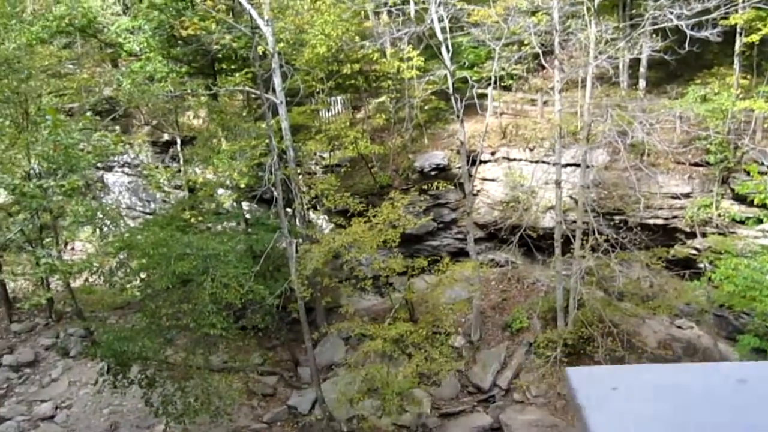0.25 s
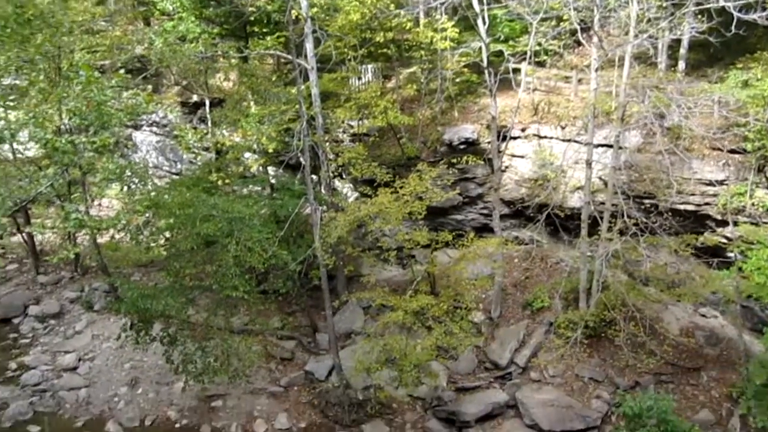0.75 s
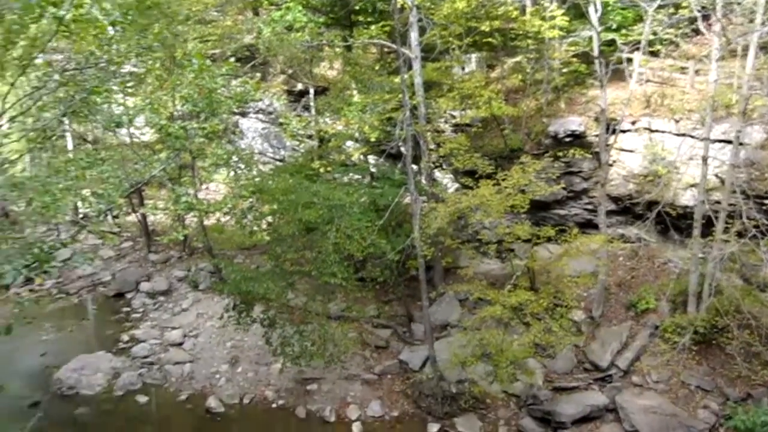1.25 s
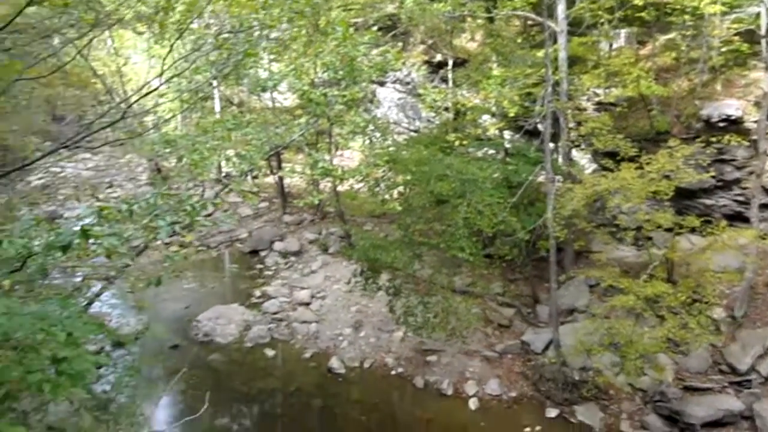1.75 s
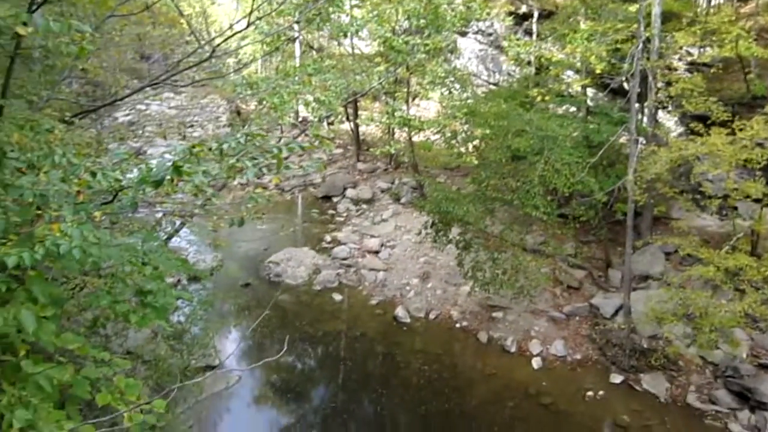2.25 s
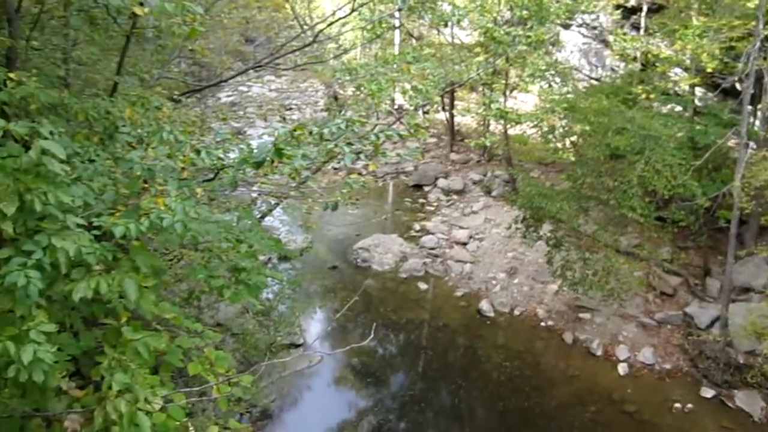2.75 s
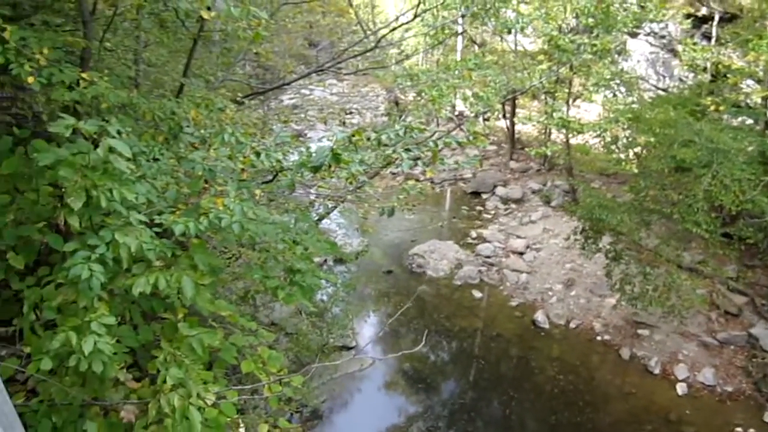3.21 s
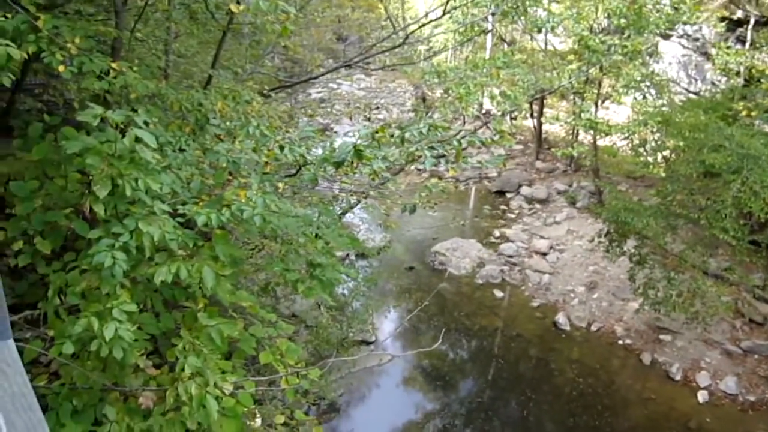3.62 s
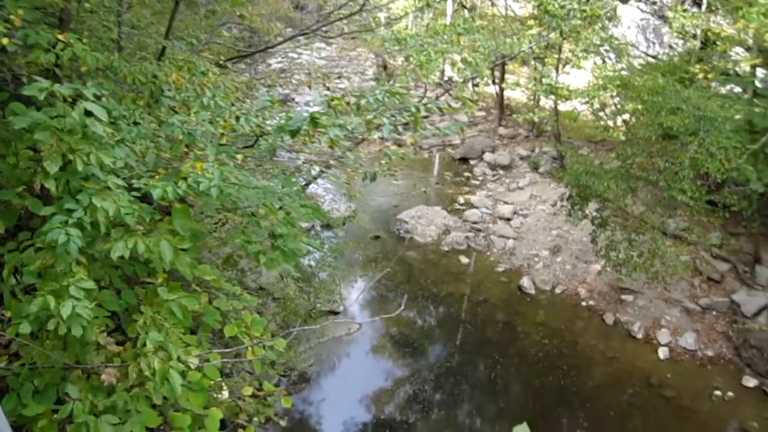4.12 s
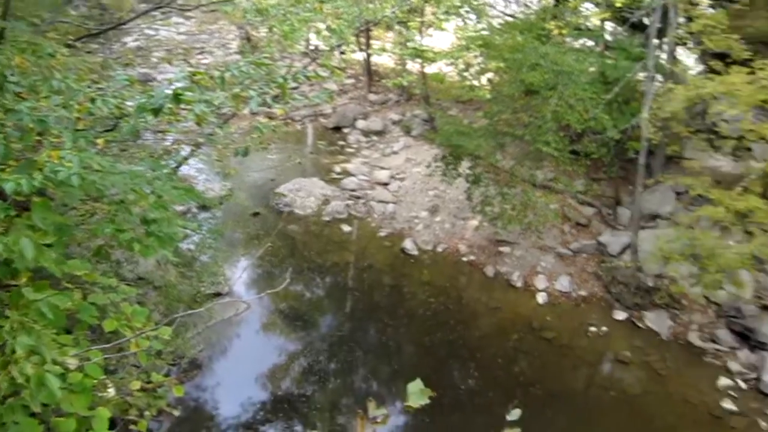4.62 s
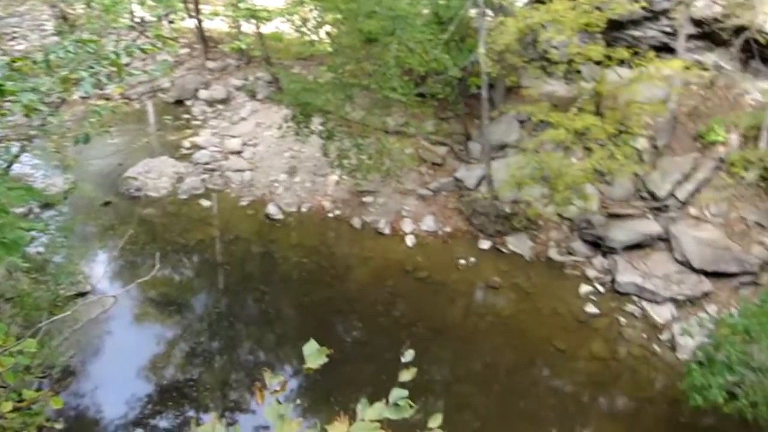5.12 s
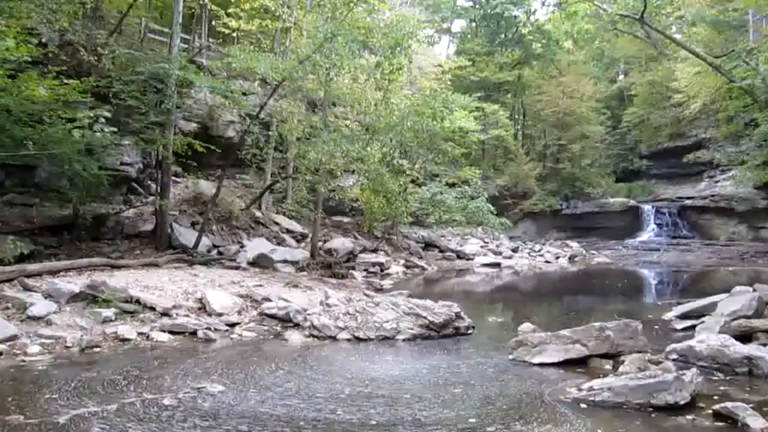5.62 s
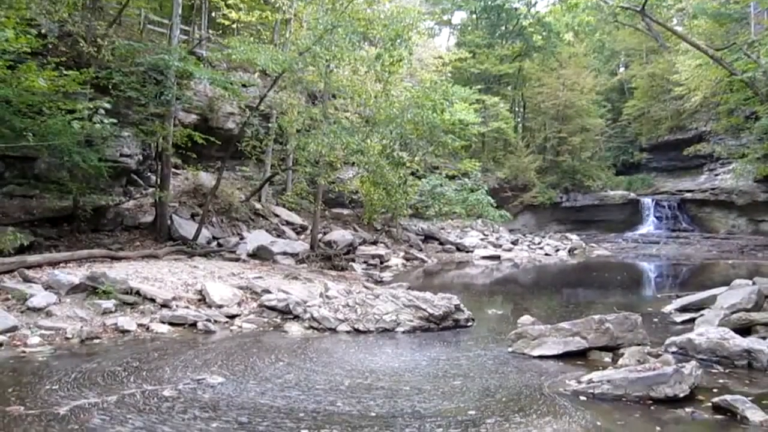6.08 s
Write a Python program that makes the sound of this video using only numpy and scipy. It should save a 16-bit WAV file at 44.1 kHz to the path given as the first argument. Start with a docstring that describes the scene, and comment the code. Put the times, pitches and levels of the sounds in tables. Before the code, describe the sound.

From 0 s a waterfall in a wooded creek valley rushes steadily, a dense, fairly bright noise with faint low-middle gurgling, picked up by a hand-held camera microphone, the same in both channels. A tiny tap comes at the very start, and a barely audible low drone lies beneath. Around 3.45-3.7 s a finger rubs the case: a short, uneven, bright scratch with a catch near 3.6 s and tiny sharp clicks at 3.6, 3.7 and 3.8 s. From about 4.1 s the hand closes round the microphone; the rush grows a little louder, hollow and nasal with airy hiss, with small clicks at 4.3 and 5.3 s and softer, fainter bumps between. The hollow tone swells slightly until everything cuts off at 5.5 s. After complete silence, at 5.75 s the waterfall returns abruptly, quieter, steadier and duller, from farther away. One crisp knock sounds at 5.94 s; the rush continues to the end, about 6.4 s.

```python
"""A wooded creek valley, where a waterfall rushes before a hand-held camera with one microphone.
The rush is noise shaped over frequency and time; the cupping hand adds moving resonances to it.
A finger rub is unevenly modulated noise, and knocks are short tone bursts that fall in pitch.
After a short silence the fall is heard, duller, from a second, farther spot.
A faint low drone, a sum of sines, lies under both."""
import sys
import numpy as np
from scipy import signal
from scipy.io import wavfile
from scipy.ndimage import uniform_filter1d

SR = 44100
rng = np.random.default_rng(int(sys.argv[2]) if len(sys.argv) > 2 else 0)


def waveform_to_disk(signal):
    """Save audio, clipped to [-1, 1], as 16-bit WAV at the path in sys.argv[1]."""
    frames = np.transpose(np.atleast_2d(signal))
    scaled = np.clip(frames, -1, 1) * 32767
    samples = np.round(scaled).astype(np.int16)
    wavfile.write(sys.argv[1], SR, samples)


N = 280035
SILENCE_START_S, SILENCE_END_S = 5.5098, 5.7422  # between the two spots


def amp(db):
    """Decibel law: amplitude ratio of a level."""
    return 10 ** (np.asarray(db) / 20)


def evened(x):
    """Normalisation to unit root-mean-square."""
    return x / np.sqrt(np.mean(x ** 2) + 1e-20)


def bump(x, centre, width):
    """Gaussian resonance: a bell-shaped lift of height 1."""
    return np.exp(-(2 * (x - centre) / width) ** 2)


def read(points, hz):
    """Logarithmic interpolation: value of a spectrum on a log-frequency axis."""
    f, value = np.transpose(points)
    return np.interp(np.log(hz + 1), np.log(f + 1), value)


def follow(rows, t):
    """Linear interpolation: every column of a table at the times t."""
    s, *columns = np.transpose(rows)
    return [np.interp(t, s, column) for column in columns]


def noise(field, size):
    """Short-time spectral synthesis: Gaussian noise shaped in dB by field(hz, t), each frame of equal power."""
    hop = size // 4
    hz = np.fft.rfftfreq(size, 1 / SR)[:, None]
    t = np.arange(N // hop + 5) * hop / SR
    gain = amp(field(hz, t) + 0 * t)
    gain = gain / np.sqrt((gain ** 2).mean(0))
    real, imaginary = rng.standard_normal((len(t), size // 2 + 1, 2)).T
    spectra = (real + 1j * imaginary) * gain
    sound = signal.istft(spectra, nperseg=size, noverlap=size - hop)[1]
    return evened(sound[:N])


# low drone: (time [s], fundamental level [dB], shift of all overtones [dB])
DRONE_COURSE = [(0, -66, -9), (1, -59, -10), (2.2, -56.5, -7), (2.6, -63, 3.5), (3.9, -64.5, 5),
                (4.15, -64, -12), (4.5, -61, -12), (5.1, -56.5, -9), (5.5, -59.5, -17.5), (5.95, -58, -26),
                (6.35, -60, -25)]
# overtones before that shift: (multiple of the fundamental, level relative to it [dB])
DRONE_OVERTONES = [(2, -4.5), (3, -10), (4, -4)]
DRONE_HZ, RISEN_HZ, RISE_FROM_S, RISE_S = 34.1, 48.8, 4.8, .38  # steady pitch, then a climb


def drone():
    """Harmonic superposition: a low sine and its overtones, varying in level and climbing once in pitch."""
    t = np.arange(N) / SR
    level_db, overtones_db = follow(DRONE_COURSE, t)
    climb = np.clip((t - RISE_FROM_S) / RISE_S, 0, 1)
    turns = np.cumsum(DRONE_HZ + (RISEN_HZ - DRONE_HZ) * climb) / SR
    fundamental = np.sin(2 * np.pi * turns)
    upper = sum(amp(db) * np.sin(2 * np.pi * (k * turns + rng.random())) for k, db in DRONE_OVERTONES)
    return amp(level_db) * np.sqrt(2) * (fundamental + amp(overtones_db) * upper)


# short knocks of the hand on the camera, levels before the envelope and high-pass:
# (time [s], tone peak [dB], start pitch [Hz], end pitch [Hz], length [s], scratch level [dB])
HAND_KNOCKS = [(.03, -30, 700, 250, .008, -45), (3.619, -22, 2000, 1400, .007, -45),
               (3.678, -20, 1700, 1400, .003, -40), (3.7895, -21, 3200, 2200, .003, -31),
               (4.16, -42, 250, 100, .012, -45), (4.313, -23, 2500, 2100, .005, -40),
               (4.47, -39, 300, 150, .01, -45), (5.105, -38, 350, 180, .008, -45),
               (5.332, -21, 1700, 1000, .006, -45), (5.9351, -12, 2250, 560, .0041, -45)]


def knocks():
    """Impact excitation: brief tones fall in pitch as the contact softens, with a scratch of noise."""
    out, grit = np.zeros(N), rng.standard_normal(N)
    for s, db, start_hz, end_hz, length, scratch_db in HAND_KNOCKS:
        count, at = round(length * SR), round(s * SR)
        turns = np.cumsum(np.geomspace(start_hz, end_hz, count)) / SR
        tone = -amp(db) * np.sin(2 * np.pi * turns)
        scratch = amp(scratch_db) * grit[at:at + count]
        shape = np.interp(np.linspace(0, 1, count), [0, .13, .64, .78, 1], [0, .9, 1, .25, 0])
        # a small shell radiates little below its pitch
        thin = signal.butter(3, min(end_hz, .45 * start_hz), "high", fs=SR)
        padded = np.pad(shape * (tone + scratch), count)
        out[at:at + 2 * count] += signal.filtfilt(*thin, padded)[count:]
    return out


RUB_START_S, RUB_PEAK_S, RUB_LIFT_S = 3.46, 3.625, 3.71  # the finger lands, presses hardest, lifts
RUB_START_DB, RUB_PEAK_DB, RUB_LIFT_DB = -35.5, -28, -31
RUB_RISE_DB_PER_S, RUB_FALL_DB_PER_S = 400, 200
BRIGHT_DB, LIFTED_BRIGHT_DB = 3, -2  # tilt at 10 kHz while pressing and once lifting
CATCH_S, CATCH_DB, CATCH_FADE_S = 3.615, 6, .02  # the skin catches: a brief jump in level
QUIET_RING_DB, RING_DB, RING_FADE_DB_PER_S = -8, 9, 28.5  # shell ring before and after the catch
# rubbed case: (frequency [Hz], relative spectral level [dB per Hz])
CASE_COLOUR = [(100, -53), (700, -19), (1300, -3.5), (2000, -3), (3500, -9), (5000, -6), (7500, -14),
               (10500, -9.5), (13500, -17)]


def rub_colour(hz, t):
    """Structural resonance: the case colours the rubbing, tilted in the treble, and its shell rings."""
    bright_db = np.interp(t, [RUB_LIFT_S - .03, RUB_LIFT_S + .03], [BRIGHT_DB, LIFTED_BRIGHT_DB])
    fading_ring_db = np.maximum(RING_DB - RING_FADE_DB_PER_S * (t - CATCH_S), 0)
    ring_db = np.where(t < CATCH_S, QUIET_RING_DB, fading_ring_db)
    return read(CASE_COLOUR, hz) + bright_db * hz / 10000 + ring_db * bump(hz, 1200, 700)


def rub():
    """Stick-slip friction: skin slips unevenly over the case as scratchy noise in the case's colour."""
    t = np.arange(N) / SR
    slips = amp(1.5 * evened(uniform_filter1d(rng.standard_normal(N), size=120)))
    press_db = np.interp(t, [RUB_START_S, RUB_PEAK_S, RUB_LIFT_S], [RUB_START_DB, RUB_PEAK_DB, RUB_LIFT_DB])
    before_db = RUB_RISE_DB_PER_S * np.maximum(RUB_START_S - t, 0)
    after_db = RUB_FALL_DB_PER_S * np.maximum(t - RUB_LIFT_S, 0)
    catch_db = CATCH_DB * (t > CATCH_S) * np.exp(-abs(t - CATCH_S) / CATCH_FADE_S)
    return amp(press_db + catch_db - before_db - after_db) * evened(slips * noise(rub_colour, size=256))


def patches(hz, t, patchy_db=0.65, gurgle_db=1.2, gurgle_hz=900):
    """Random modulation: splashes vary in blobs a few hundred Hz wide, narrower gurgles in the low middle."""
    z, g = rng.standard_normal((len(t), len(hz), 2)).T
    # smoothed over frequency, then over time
    wide = evened(uniform_filter1d(uniform_filter1d(z, size=12, axis=0), size=14, axis=1))
    narrow = evened(uniform_filter1d(uniform_filter1d(g, size=3, axis=0), size=8, axis=1))
    return patchy_db * wide + gurgle_db * bump(hz, gurgle_hz, 1800) * narrow


# rush dulled by distance: (frequency [Hz], relative spectral level [dB per Hz])
FAR_COLOUR = [(20, -28), (60, -17), (170, -15), (300, -12), (460, -9), (770, -5.5), (1100, -6), (1400, -6),
              (1800, -8.5), (3500, -8.5), (5000, -12), (7500, -19.5), (10000, -25.5), (13600, -35)]


def far_colour(hz, t):
    """Distance attenuation: the farther rush has lost treble."""
    return read(FAR_COLOUR, hz) + patches(hz, t)


# rush at the bare microphone: (frequency [Hz], relative spectral level [dB per Hz])
OPEN_COLOUR = [(20, -20), (60, -15.5), (200, -9), (400, -7.5), (700, -3), (1100, 2), (1600, -2),
               (2300, -3.5), (2900, -3), (4100, -4), (5500, -8), (7400, -11.5), (10000, -13.5),
               (13600, -16.5)]
# still resonances of the fully cupped hand: (centre [Hz], width [Hz], lift [dB])
CUP_RESONANCES = [(1730, 630, 4), (2910, 250, 2), (5000, 3900, 6.5), (7150, 1400, -2)]
# rush and hand at the near spot, also read by rush():
# (time [s], rush level [dB], cupping [0 open, 1 closed], low resonance [Hz], main resonance [Hz])
NEAR_COURSE = [(0, -31.5, 0.2, 720, 1180), (1.1, -31, 0.05, 660, 1150), (2.2, -31, .15, 610, 1150),
               (2.7, -31.5, .1, 630, 1150), (3.1, -31, 0, 640, 1200), (3.4, -30, .4, 660, 1250),
               (3.8, -29.5, 0.34, 630, 1350), (4.1, -28.5, .75, 600, 1300), (4.3, -27.5, 0.85, 536, 1170),
               (4.6, -27, 1.01, 520, 1140), (4.9, -27.5, 0.96, 540, 1190), (5.3, -27, .95, 563, 1260),
               (5.51, -27.5, 1.01, 577, 1243)]
MAIN_OPEN_DB, MAIN_CUPPED_DB = -1.3, 2.5  # the main resonance grows as the hand closes
TIGHTEN_FROM_S, TIGHTEN_DB_PER_S = 5.31, 19  # the grip tightens and the main resonance swells
AIRY_DB, AIRY_FROM_S, AIRY_RISE_S = 8, 4.08, .35  # a narrow gap in the hand lifts the high treble
TOP_LIFT_DB, TOP_LIFT_S, TOP_LIFT_WIDTH_S = 2.1, 4.15, .7  # lift at 10 kHz while the hand closes


def near_colour(hz, t):
    """Cavity resonance: the hand near the microphone adds hollow peaks that move with it."""
    _, cup, low_hz, main_hz = follow(NEAR_COURSE, t)
    tighten_db = TIGHTEN_DB_PER_S * np.clip(t - TIGHTEN_FROM_S, 0, 1)
    main_db = MAIN_OPEN_DB + cup * (MAIN_CUPPED_DB - MAIN_OPEN_DB) + tighten_db
    airy_db = AIRY_DB * np.clip((t - AIRY_FROM_S) / AIRY_RISE_S, 0, 1)
    top_db = TOP_LIFT_DB * bump(t, TOP_LIFT_S, TOP_LIFT_WIDTH_S)
    still = cup * sum(db * bump(hz, f, width) for f, width, db in CUP_RESONANCES)
    moving = (4.5 + 2.0 * cup) * bump(hz, low_hz, 230) + main_db * bump(hz, main_hz, 690)
    treble = airy_db * bump(hz, 9830, 2800) + top_db * (hz / 10000) ** 2
    return read(OPEN_COLOUR, hz) + still + moving + treble + patches(hz, t)


FAR_DB = -33  # rush level at the farther spot


def rush():
    """Incoherent summation: countless splashes merge into a roar, heard from one spot and then the other."""
    t = np.arange(N) / SR
    near = amp(follow(NEAR_COURSE, t)[0]) * noise(near_colour, size=1024)
    far = amp(FAR_DB) * noise(far_colour, size=1024)
    return np.where(t < SILENCE_END_S, near, far)


def scene():
    """Linear superposition: all sources add at one microphone, alike in both channels."""
    mono = drone() + knocks() + rub() + rush()
    return np.array([mono, mono])


def record(dry):
    """Gating and band limitation: an abrupt silence between the two spots, then a steep low-pass."""
    t = np.arange(N) / SR
    cut = dry * ((t < SILENCE_START_S) | (t > SILENCE_END_S))
    low_pass = signal.firwin(401, 13570, window=("kaiser", 9), fs=SR)  # edge in Hz
    return signal.oaconvolve(cut, low_pass[None], "same")


dry = scene()
out = record(dry)
waveform_to_disk(out)
```